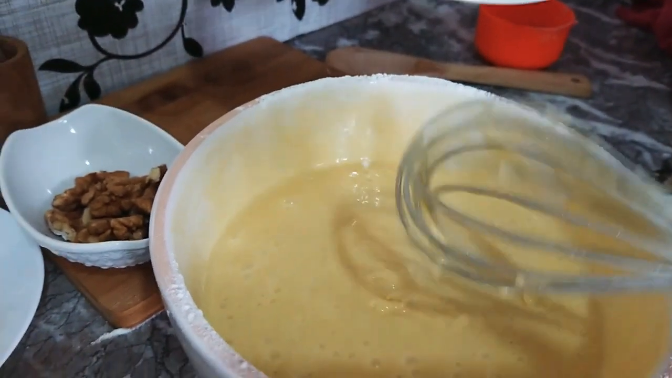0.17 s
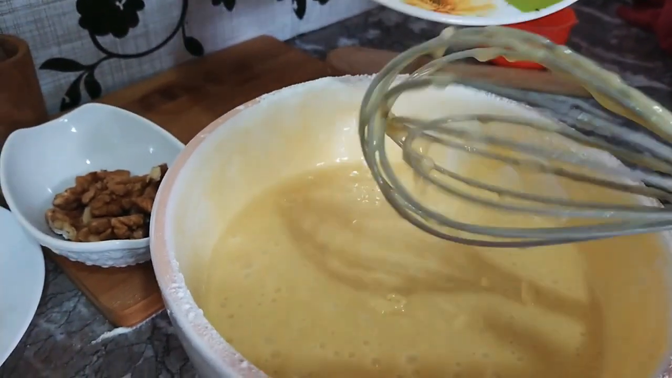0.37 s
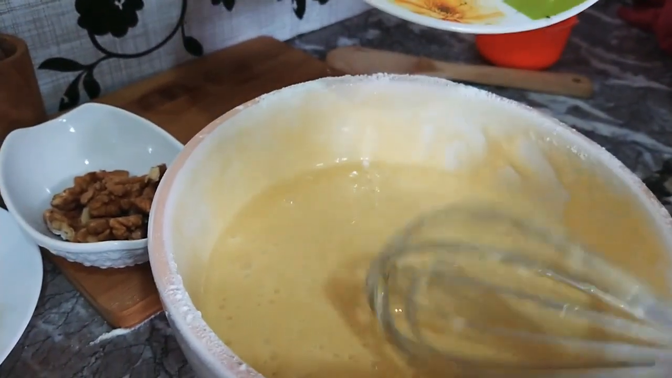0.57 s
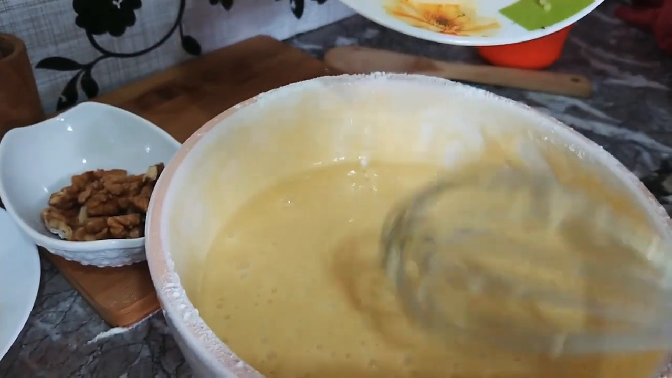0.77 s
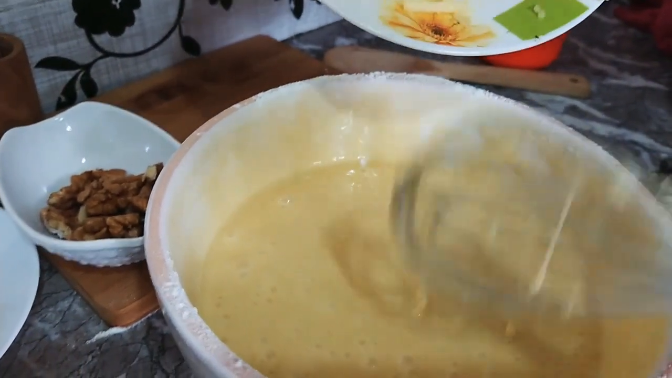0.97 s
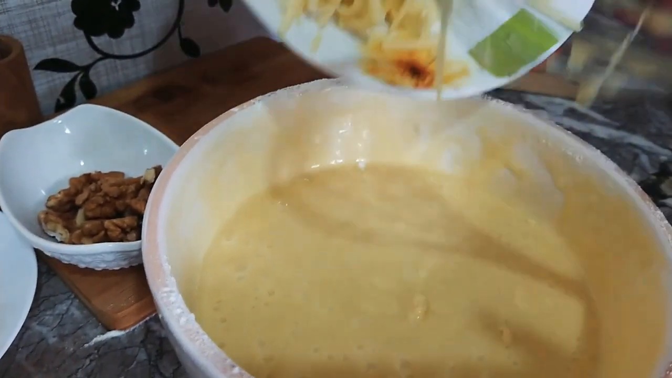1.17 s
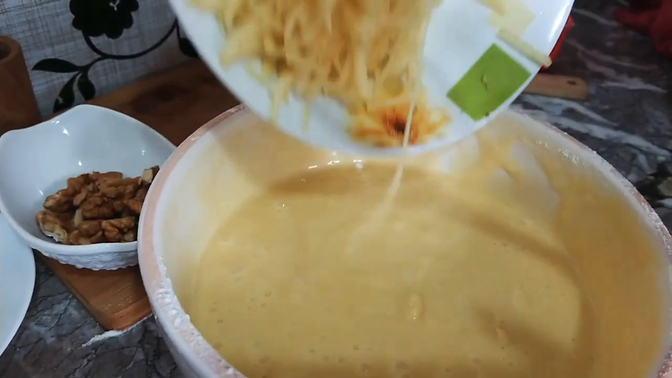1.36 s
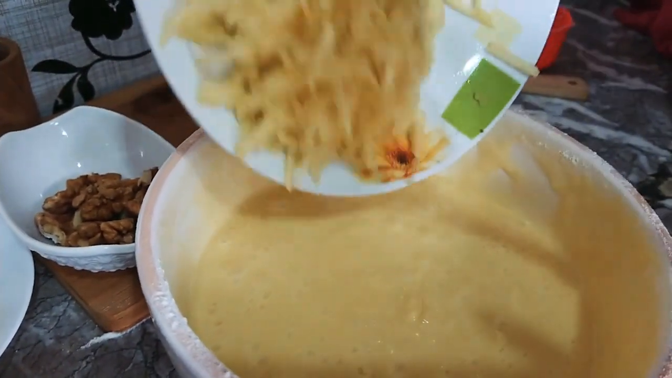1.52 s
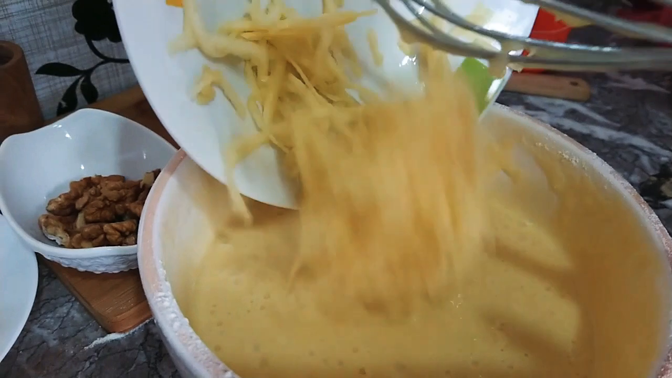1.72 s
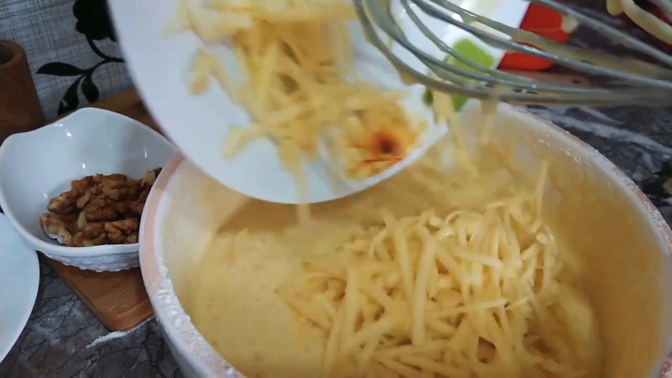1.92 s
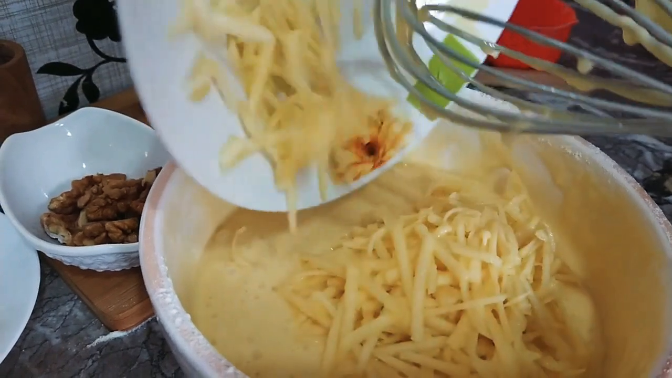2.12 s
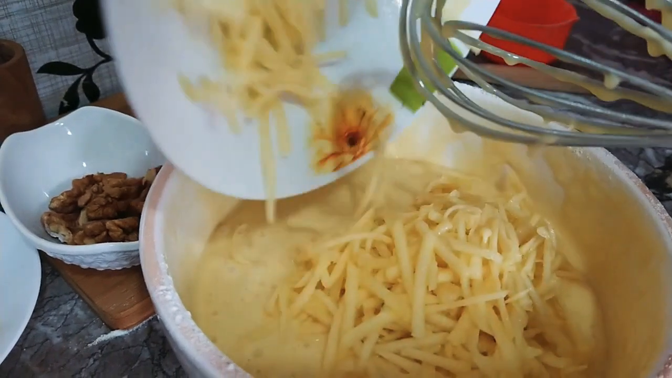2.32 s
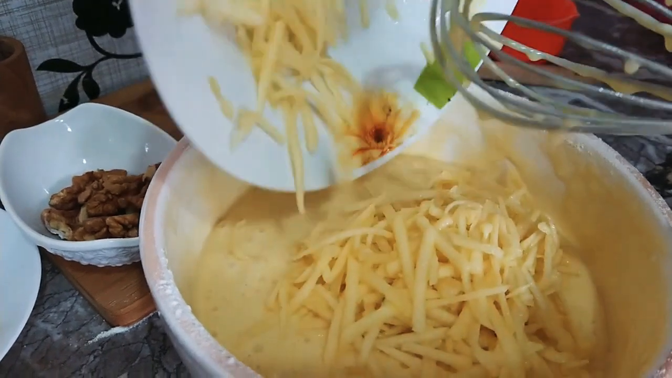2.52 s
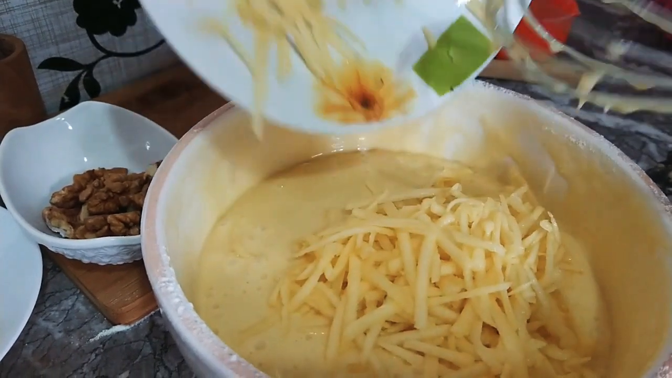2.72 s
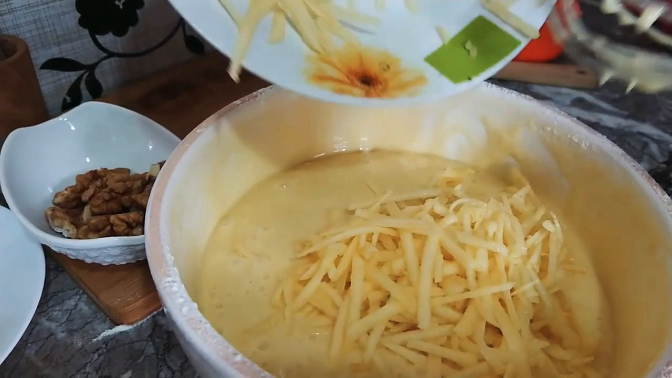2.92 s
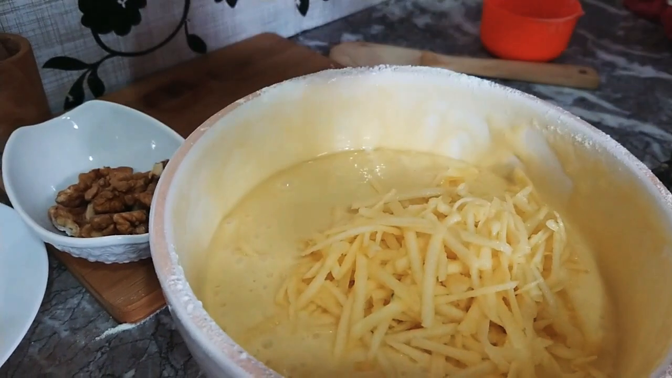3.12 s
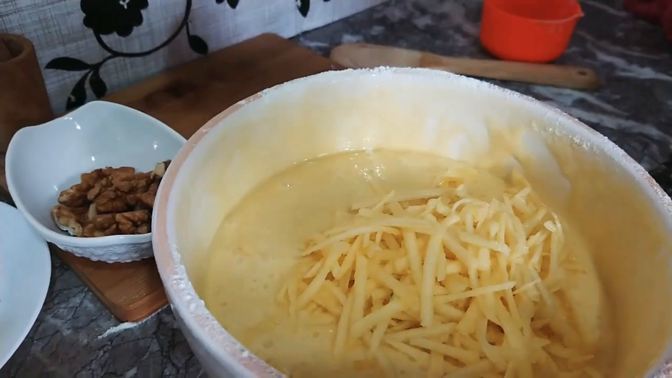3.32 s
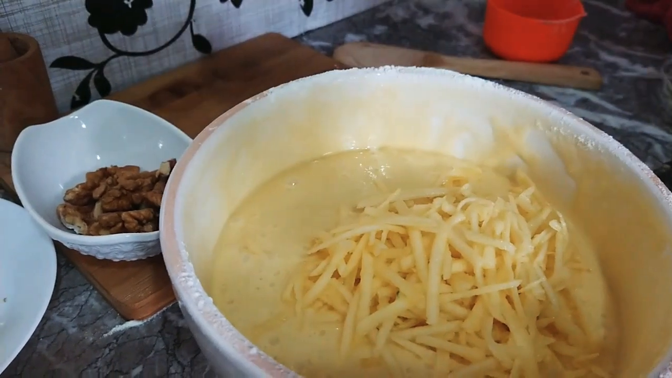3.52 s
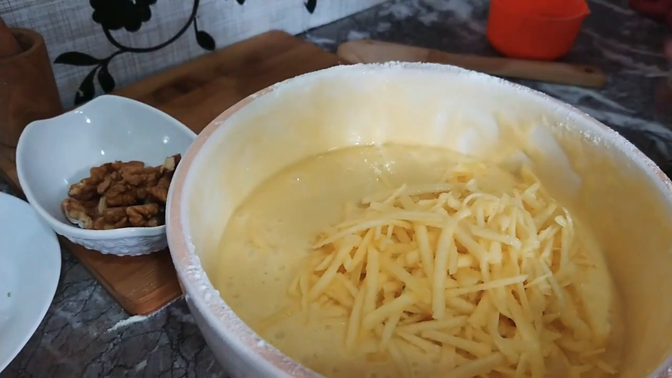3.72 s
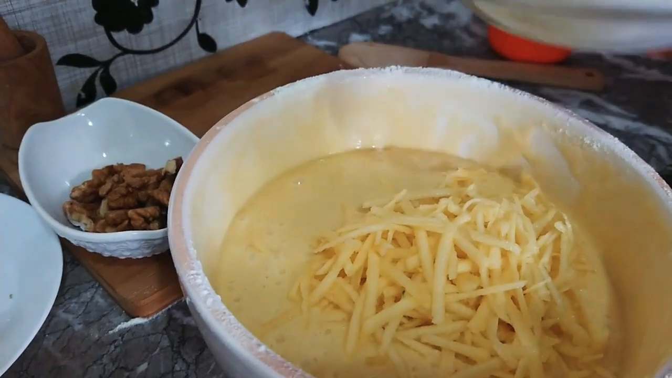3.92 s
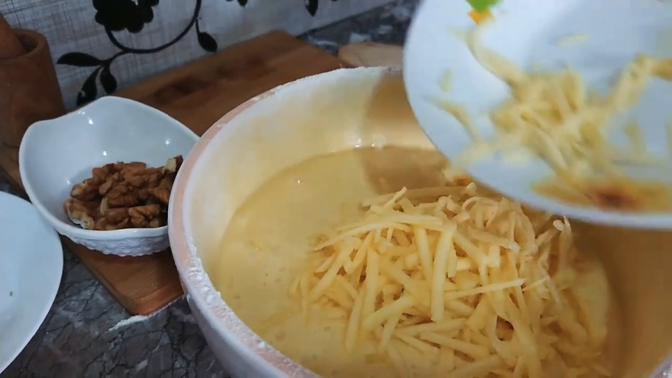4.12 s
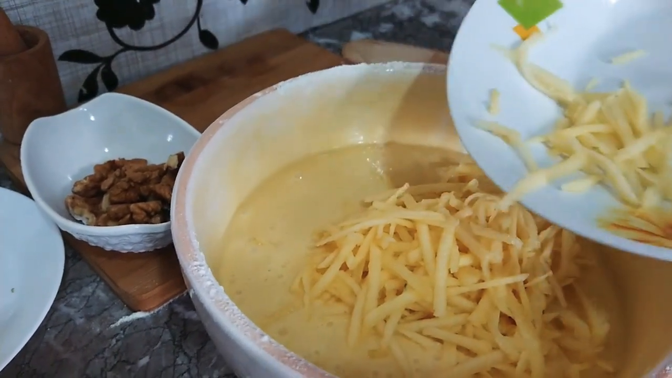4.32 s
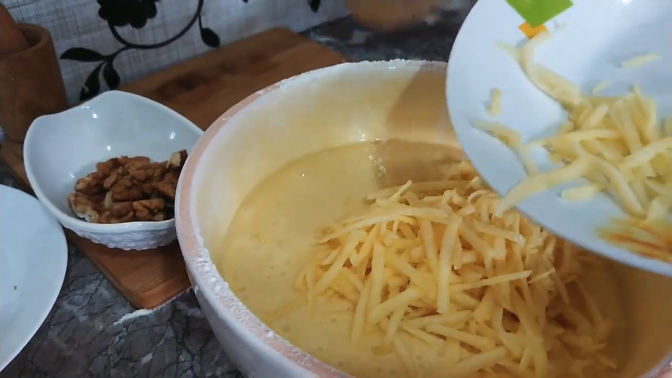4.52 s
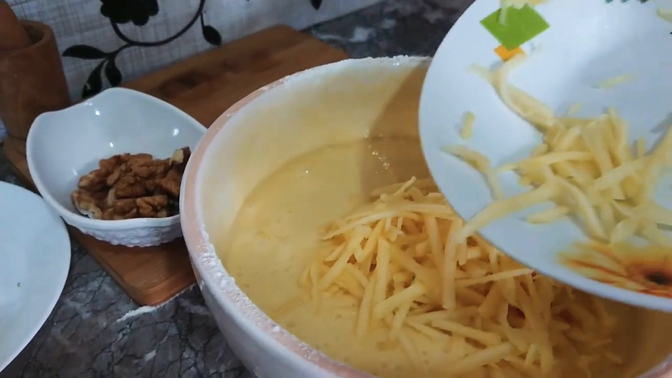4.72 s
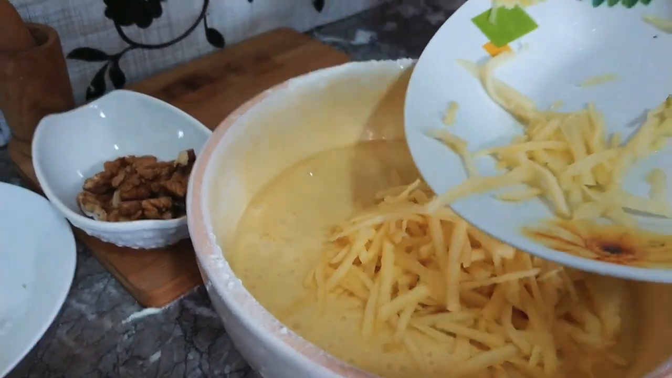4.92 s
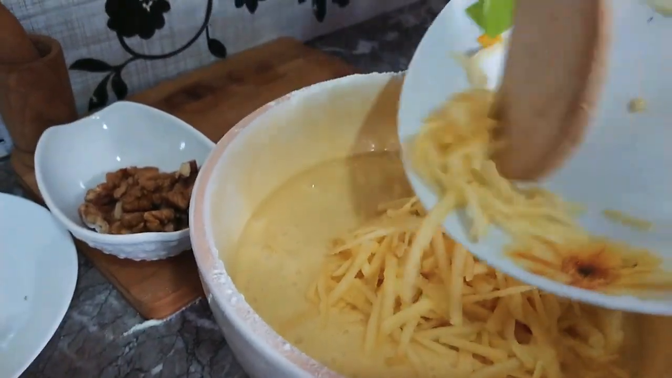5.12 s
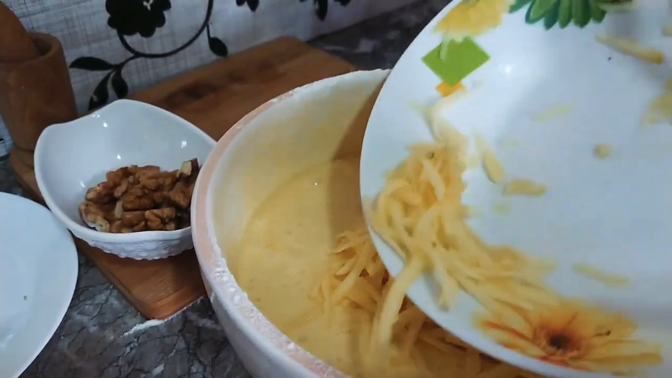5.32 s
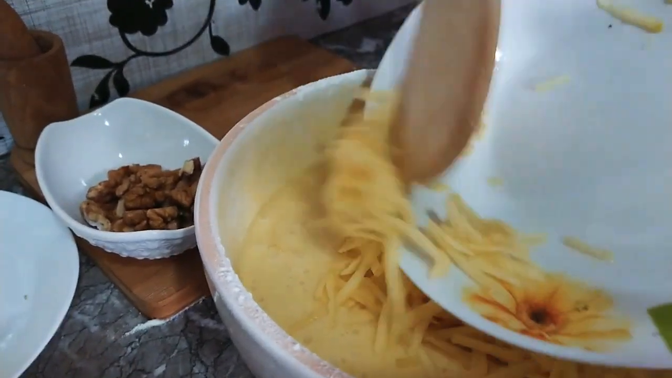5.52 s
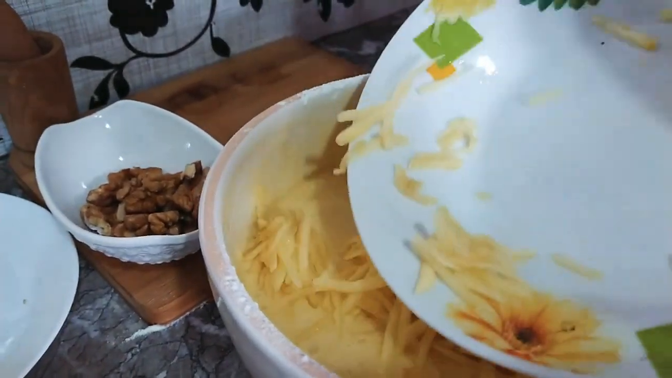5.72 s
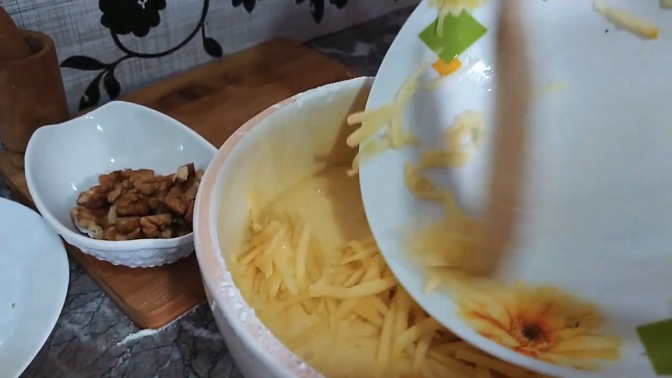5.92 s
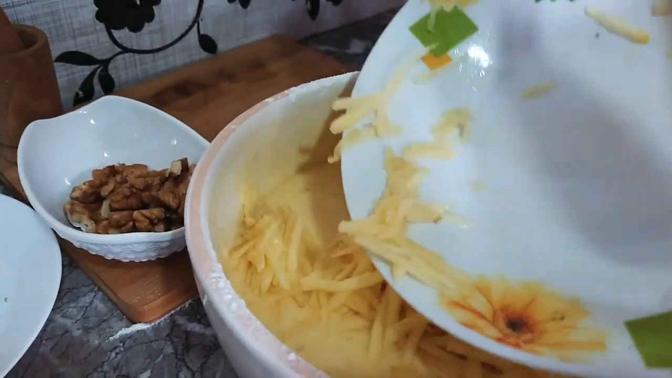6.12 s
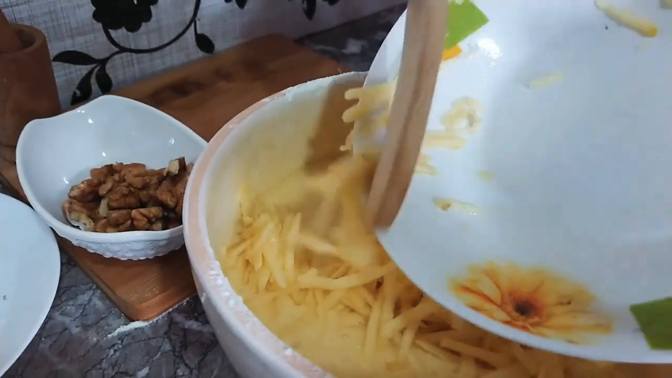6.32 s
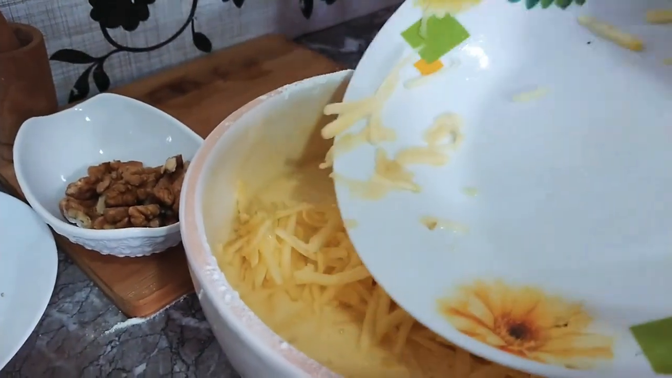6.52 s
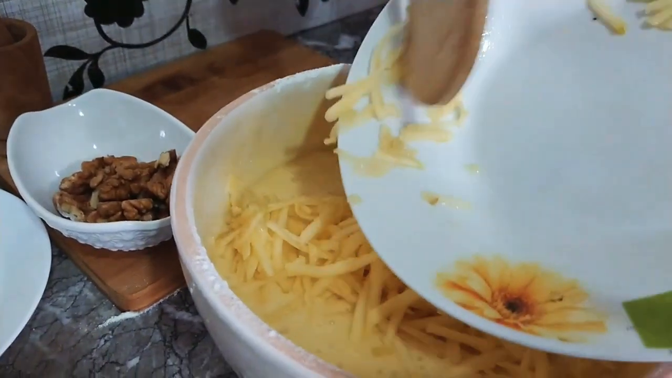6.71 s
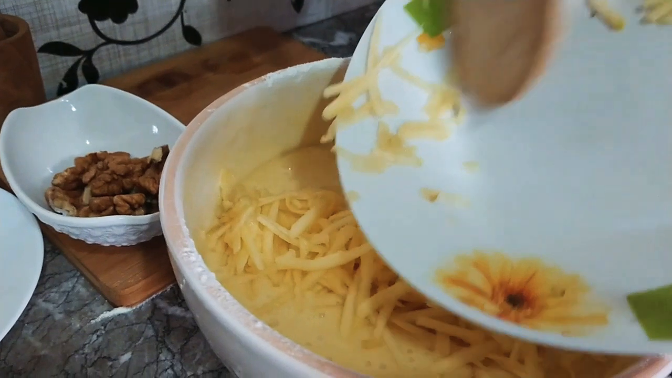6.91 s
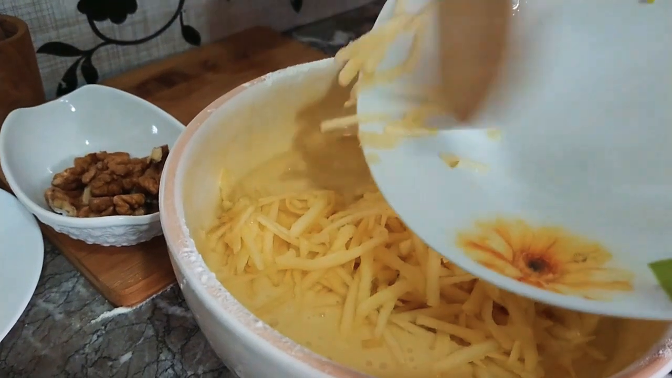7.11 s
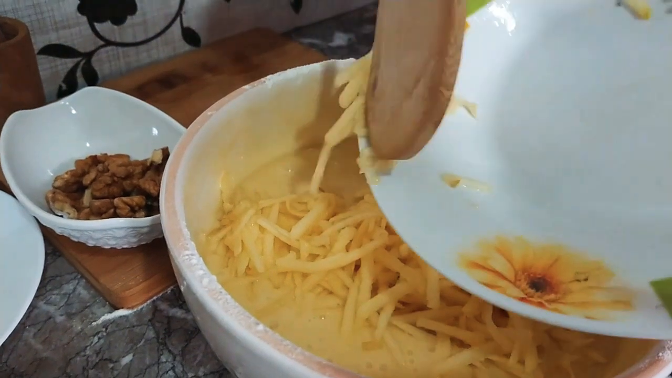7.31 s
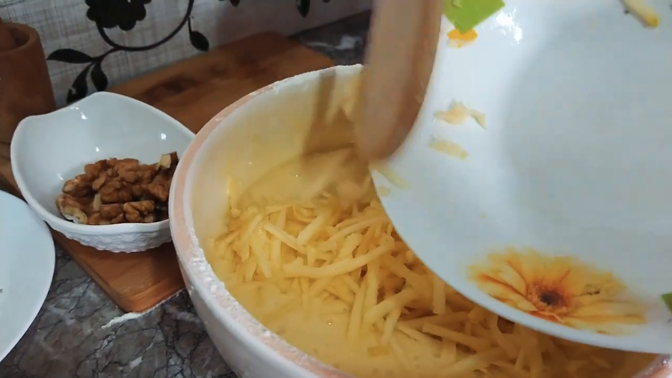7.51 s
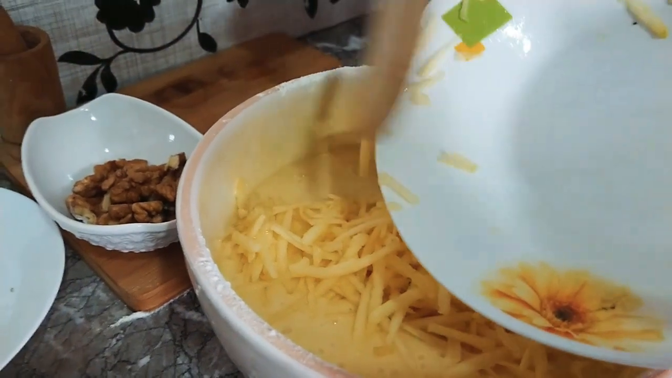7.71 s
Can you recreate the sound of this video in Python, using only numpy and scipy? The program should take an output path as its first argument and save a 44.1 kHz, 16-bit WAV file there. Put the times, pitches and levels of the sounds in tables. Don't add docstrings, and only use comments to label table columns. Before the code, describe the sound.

In a small hard-walled kitchen, a wire whisk is tapped on a bowl rim: two ticks, a pause, then three more, each with a short bowl rattle and low worktop boom. Steady hiss and faint distant bumps fill the gap. Near five seconds a wooden spoon knocks a hand-held plate, then raps it irregularly to the end, with brief ceramic ringing. Close stereo microphones, hissier on the right.

```python
import sys
import numpy as np
from scipy import signal
from scipy.fft import rfft, irfft
from scipy.io import wavfile

SR = 44100
rng = np.random.default_rng(int(sys.argv[2]) if len(sys.argv) > 2 else 0)


def bounce(signal):
    frames = np.transpose(np.atleast_2d(signal))
    limited = np.clip(frames, -1, 1)
    pcm = np.round(limited * 32767).astype(np.int16)
    wavfile.write(sys.argv[1], SR, pcm)


def to_linear_factor(level_db):
    exponent = np.asarray(level_db, float) / 20
    return 10 ** exponent


N = 342657
LEAD = SR // 4

# pitch in Hz, likeness (1 = the same).
LIKENESS = [(60, 1), (240, 0.44), (950, 0.0092), (3770, -2), (15000, -0.54)]


def at_hz(points, hz):
    hz_points, values = np.array(points).T
    return np.interp(np.log(hz), np.log(hz_points), values)


def place(s):
    return LEAD + np.round(np.asarray(s) * SR).astype(int)


def band(x, low_hz, high_hz):
    return signal.sosfilt(signal.butter(2, [low_hz, high_hz], "band", fs=SR, output="sos"), x)


def no_bass(x, low_hz):
    return signal.sosfilt(signal.butter(2, low_hz, "high", fs=SR, output="sos"), x)


def left_right(mid, side, alike):
    return np.sqrt(1 + alike) * mid + np.sqrt(1 - alike) * side * np.array([[1], [-1]])


def ring(force, hz, t60):
    r = to_linear_factor(-60 / (t60 * SR))
    w = 2 * np.pi * hz / SR
    return signal.lfilter([0, np.sin(w)], [1, -2 * r * np.cos(w), r * r], force + 1e-18)


def struck(modes, times, blows_db, contact, flip=-1, spread_db=2.5):
    out = 0
    luck_db = spread_db * rng.standard_normal((len(times), len(modes)))
    for k, (hz, level_db, t60) in enumerate(modes):
        clicks = np.zeros(N + LEAD)
        clicks[place(times)] = flip ** k * to_linear_factor(blows_db + level_db + luck_db[:, k])
        out = out + ring(clicks, hz, t60)
    return signal.oaconvolve(out, contact)[:N + LEAD]


def crack(times, blows_db, low_hz, high_hz, t60):
    out = np.zeros(N + LEAD)
    t = np.arange(int(t60 * SR)) / SR
    for at, db in zip(place(times), blows_db):
        burst = to_linear_factor(db - 60 * t / t60) * rng.standard_normal(SR // 2)[:len(t)]
        out[at:at + len(t)] += burst[:len(out) - at]
    return band(out + 1e-18, low_hz, high_hz)


def rattle(wait_s, length_s, count):
    force = np.zeros(int((wait_s + length_s) * SR) + 2)
    when = wait_s + length_s * rng.random(count)
    force[(when * SR).astype(int)] = rng.uniform(0.99, 1, count) * rng.choice([-1, 1], count)
    return force / np.sqrt(count)


def whisk():
    # start in seconds, tick in dB, wire ring in dB, shove in dB.
    taps = [
        (-.115, -35, -32, -25),
        (0.0434, -20.5, -28.5, -24),
        (0.2042, -25, -29.5, -23.5),
        (0.7104, -25, -40.5, -32.5),
        (0.8696, -21, -40.5, -28.5),
        (1.0215, -19, -39.5, -24.5),
    ]
    # pitch in Hz, level in dB, t60 in seconds.
    wire_modes = [(2576, -3, 0.15), (2860, 1.5, 0.02), (3380, -8, 0.03), (3760, 3, 0.02), (3952, 11, 0.031),
                  (4180, 11.5, 0.008), (5450, -2, 0.04), (7430, 9.5, 0.011)]
    bowl_modes = [(230, 1.5, 0.033), (333, -5.5, 0.11), (395, -8, 0.051), (510, -10, 0.043),
                  (580, 0, 0.055), (677, 4, 0.072), (770, -5, 0.05), (824, -4, 0.15), (885, -5, 0.05),
                  (1230, -12, 0.075), (1327, -14, 0.045)]
    worktop_modes = [(114, -1, .25), (129, 0, .3), (146, -11, .45), (90, -8, .25)]
    rocking_modes = [(160, -5, .3), (203, 5, .13), (240, -6, .12), (172, -8, .2)]

    s, tick_db, ring_db, shove_db = np.transpose(taps)
    over_full_db = shove_db + 24.5
    wall_db = -27 + 0.63 * over_full_db
    rock_db = -27 + 2.1 * over_full_db

    wires = struck(wire_modes, s, ring_db, np.hanning(5) / 2)
    wires += crack(s, tick_db, low_hz=1130, high_hz=8000, t60=0.019)
    wall = struck(bowl_modes, s, wall_db, rattle(0.005955, .022, count=14))
    wall += crack(s + 0.0068, wall_db + 16.5, low_hz=310, high_hz=934, t60=0.093)

    flex_s = np.arange(-.011, .011, 1 / SR)
    push = np.hanning(len(flex_s)) * np.cos(2 * np.pi * 150 * flex_s)
    push = 4 * push / len(push)
    felt = s + .0065
    boom = struck(worktop_modes, felt, shove_db, push, flip=1, spread_db=1)
    boom += struck(rocking_modes, felt, rock_db, push, flip=1, spread_db=2)
    return wires + wall, boom


def spoon():
    # start in seconds, dry knock in dB, knock pitch in Hz, plate face in dB, rim in dB.
    knocks = [(4.9358, -9, 1700, -15, -23), (5.8342, -16, 1370, -29, -20.5), (5.8797, -22, 1100, -42, -42),
              (6.2402, -12, 1440, -23, -29), (6.6314, -8.5, 1700, -42, -15), (6.7401, -16, 1390, -50, -38),
              (6.9381, -8, 1440, -39.5, -33.5), (7.0014, -2.5, 1660, -29, -35.5),
              (7.2281, -29, 1170, -60, -71), (7.4804, -9, 1270, -42, -45), (7.5758, -15, 1370, -40.5, -33),
              (7.6854, -6.5, 1310, -41, -32.5)]
    # pitch in Hz, t60 in seconds.
    face_notes = [(813, .1), (842, .14), (1135, .05), (1602, .07), (1712, .22), (1765, .08), (1954, .05),
                  (2260, .05), (2462, .09), (2665, .13), (3730, .12), (4900, .1)]
    rim_notes = [(2334, .06), (2400, .04), (2520, .05), (2960, .035), (3095, .035), (3370, .045),
                 (3480, .04), (3570, .06), (3690, .03), (4200, .05), (4420, .03), (4700, .025),
                 (5700, .025), (7150, .02)]
    face_strengths = [-7, -9, -8, -1, -10, -3, -6, -7, 2, -4, -6, -3]
    rim_strengths = [-6, -2, -1, -4, -2, -2, -3, -8, -5, -4, -4, -10, -9, -7]
    # pitch in Hz, level in dB, t60 in seconds.
    wood_modes = [(700, -7, .025), (870, -7, .035), (1057, 0, .04), (1190, -1, .025), (1440, -8, .015),
                  (2020, -9, .02)]
    # delay in seconds, gain (minus = upside down).
    echoes = [(.0032, -.22), (.0145, .2)]

    s, knock_db, knock_hz, face_db, rim_db = np.transpose(knocks)
    whole_ring_db = 20 * np.log10(np.hypot(to_linear_factor(face_db), to_linear_factor(rim_db)))
    crack_db = 3.5 + whole_ring_db
    wood_db = knock_db - 15 - 10 * (knock_hz / 1000 - 1.3)

    face = [(hz, db, t60) for (hz, t60), db in zip(face_notes, face_strengths)]
    rim = [(hz, db, t60) for (hz, t60), db in zip(rim_notes, rim_strengths)]
    plate = struck(face[:-2], s, face_db, [1]) + struck(rim, s, rim_db, [1])
    plate += struck(face[-2:], s, (face_db + crack_db) / 2 - 8.5, [1])
    plate += crack(s, crack_db, low_hz=2680, high_hz=12300, t60=0.0073)
    plate += crack(s, rim_db + 4, low_hz=2230, high_hz=4900, t60=0.066)

    wood = -struck(wood_modes, s + 0.00085, wood_db, [1], flip=1)
    for at, db, hz in zip(place(s), knock_db, knock_hz):
        turn = np.pi * (np.arange(int(2 * SR / hz)) * hz / SR - .8)
        pulse = (1 - 2 * turn ** 2) * np.exp(-turn ** 2)
        for lag_s, gain in [(0, 1)] + echoes:
            start = at + int(lag_s * SR)
            wood[start:start + len(pulse)] += gain * to_linear_factor(db) * pulse

    hand = crack(s, (knock_db + crack_db) / 2 - 17, low_hz=222, high_hz=413, t60=0.086)
    return no_bass(plate, 620), no_bass(wood, 330) + hand


def kitchen(x, wet_db):
    # pitch in Hz, t60 in seconds.
    room_t60 = [(120, 0.61), (500, 0.31), (1500, 0.35), (4000, 0.35), (9000, 0.28)]
    # pitch in Hz, likeness (1 = the same).
    room_likeness = [(120, 0.98), (350, 0.83), (700, 0.27), (1500, 0.032), (4000, 0.038)]

    t = np.arange(int(.6 * SR)) / SR
    answer = 0
    for low_hz in 60 * 2. ** np.arange(8):
        mid, side = band(rng.standard_normal((2, len(t))), low_hz, 2 * low_hz)
        centre_hz = np.sqrt(2) * low_hz
        alike = np.clip(at_hz(room_likeness, centre_hz), 0, 1)
        fade = to_linear_factor(-60 * t / at_hz(room_t60, centre_hz))
        answer = answer + left_right(mid, side, alike) * fade
    answer = answer * np.clip((t - .002) / 0.0015, 0, 1)
    answer /= np.sqrt(np.sum(answer ** 2, axis=1, keepdims=True))
    return to_linear_factor(wet_db) * signal.oaconvolve(x[None], answer, axes=1)[:, :N + LEAD]


def bumps():
    # start in seconds, pitch in Hz, level in dB, t60 in seconds.
    thuds = [(1.5, 365, -49, 0.35), (1.49, 790, -49, 0.2), (1.499, 150, -51.5, .44),
             (1.74, 1060, -53.5, 0.58), (1.749, 265, -57, 0.49), (1.901, 110, -58, 0.33),
             (2.76, 910, -58, 1.0), (4.48, 880, -55, .2), (4.54, 2500, -48, .15), (4.94, 140, -53, 0.24),
             (5.348, 335, -59, 0.22), (7.25, 300, -52, 0.22)]
    # start in seconds, pitch in Hz, level in dB, t60 in seconds.
    hums = [
        (1.73, 118, -50.5, 0.54),
        (2.75, 715, -49.5, 0.55),
        (2.78, 937, -60, 0.44),
        (3.95, 713, -58, 0.47),
        (4.25, 1193, -48, 0.22),
        (5.699, 202, -56.5, 0.75),
        (7.258, 110.3, -47.5, 0.43),
    ]

    out = np.zeros((2, N + LEAD))
    resonances = [(*row, 0.52 * row[1]) for row in thuds]
    resonances += [(*row, 46) for row in hums]
    for s, hz, db, t60, width_hz in resonances:
        start = place(s)
        t = np.arange(min(int(1.5 * t60 * SR), N + LEAD - start)) / SR
        noise = band(rng.standard_normal((2, SR * 2)), hz - width_hz / 2, hz + width_hz / 2)
        mid, side = noise[:, SR // 2:SR // 2 + len(t)]
        alike = np.clip(at_hz(LIKENESS, hz) + 0.74, 0, .99)
        pair = left_right(mid, side, alike) / mid.std()
        swell = 1 - np.exp(-t / (0.045 * t60))
        pair = pair * to_linear_factor(db - 60 * t / t60) * swell
        out[:, start:start + len(t)] += pair * to_linear_factor([[-1.5], [1.5]])
    return out


def hiss():
    # pitch in Hz, level in dB.
    colour = [(15, -50), (25, -18), (75, -2.5), (261, -11), (2440, -10), (3200, -6.5), (8680, -5.5),
              (15700, .5)]
    # pitch in Hz, left minus right in dB.
    balance = [(60, -7.5), (110, -4), (700, -9.5), (1290, -3.5), (2380, -12.5), (4400, -12.5), (8120, -5),
               (15000, -8.5)]
    # pitch in Hz,
    # width in Hz, level in dB.
    ports = [(2960, 880, 3), (3173, 14.3, 13), (3287, 42, 7.5), (7400, 1960, 5), (6030, 100, -13.5)]

    hz = np.fft.rfftfreq(N, 1 / SR).clip(10)
    mid, side = rfft(rng.standard_normal((2, N)))
    pair = left_right(mid, side, np.clip(at_hz(LIKENESS, hz), 0, .99))
    port_db = sum(db / (1 + (2 * (hz - top_hz) / width_hz) ** 2) for top_hz, width_hz, db in ports)
    lean_db = at_hz(balance, hz) / 2
    noise = irfft(pair * to_linear_factor(at_hz(colour, hz) + [lean_db, port_db - lean_db]), N)
    return to_linear_factor(-41.5) * noise / noise.mean(axis=0).std()


def scene():
    clatter, boom = whisk()
    plate, wood = spoon()
    left = np.roll(clatter, -14) + to_linear_factor(0.5) * boom
    left = left + to_linear_factor(-8) * np.roll(plate, -9) + to_linear_factor(1.5) * wood
    right = clatter + boom + to_linear_factor(2.5) * plate + wood
    room = kitchen(clatter, wet_db=-3.0) + kitchen(plate, wet_db=0.0) + kitchen(wood, wet_db=-5.0)
    return (np.array([left, right]) + room + bumps())[:, LEAD:]


def roll_off(x):
    return signal.sosfilt(signal.butter(12, 17000, fs=SR, output="sos"), x)


def record(dry):
    dip = signal.sosfilt(signal.butter(1, [1900, 3800], "band", fs=SR, output="sos"), dry[0])
    left = to_linear_factor(-1.4) * (dry[0] - .5 * dip)
    right = to_linear_factor(1.4) * dry[1]
    pair = np.array([left, right]) + hiss()
    pair = 1.3 * np.tanh(pair / 1.3)
    pair = signal.sosfilt(signal.ellip(10, .5, 55, 15750, fs=SR, output="sos"), pair)
    return roll_off(pair)


dry = scene()
out = record(dry)
bounce(out)
```